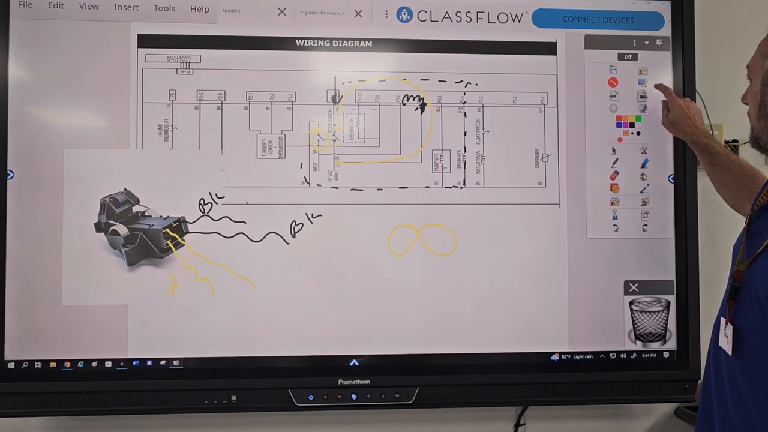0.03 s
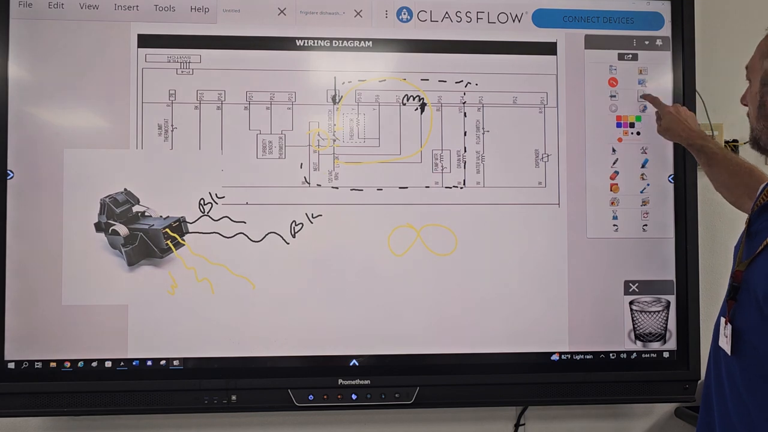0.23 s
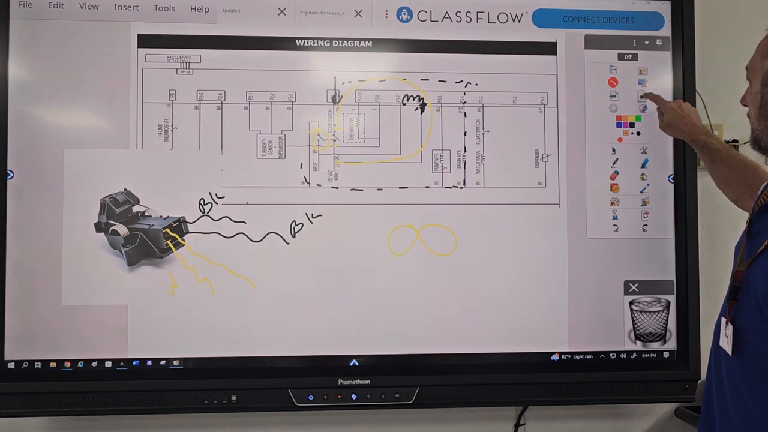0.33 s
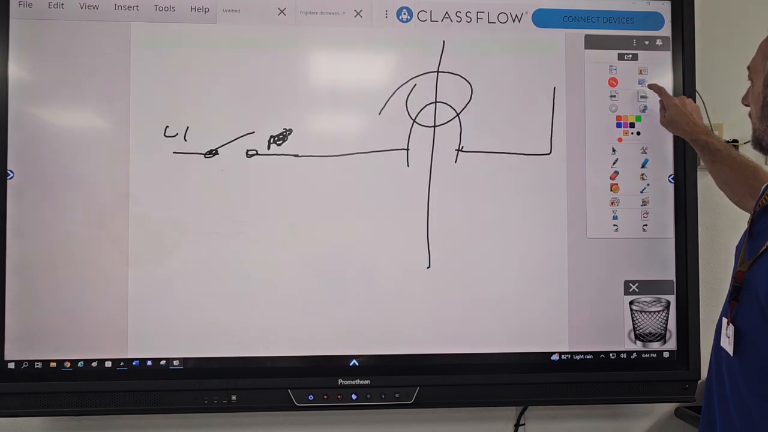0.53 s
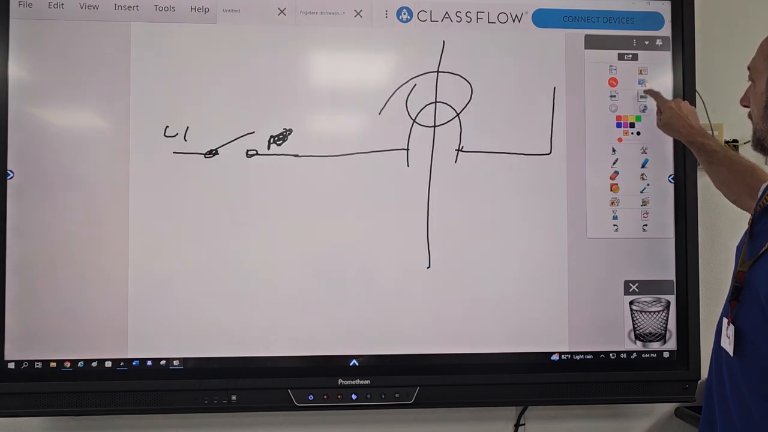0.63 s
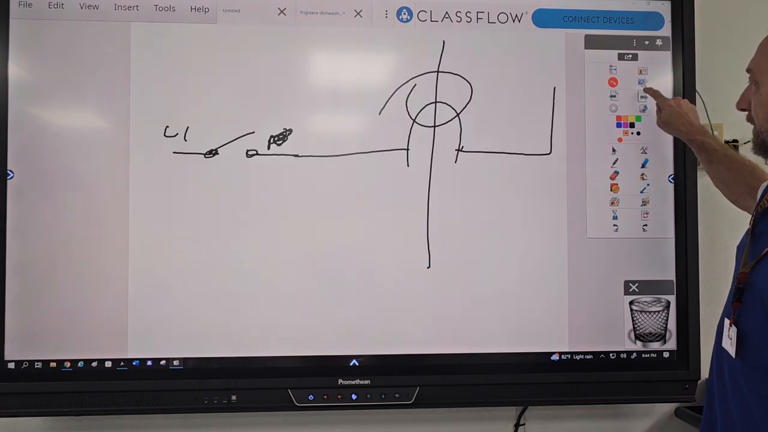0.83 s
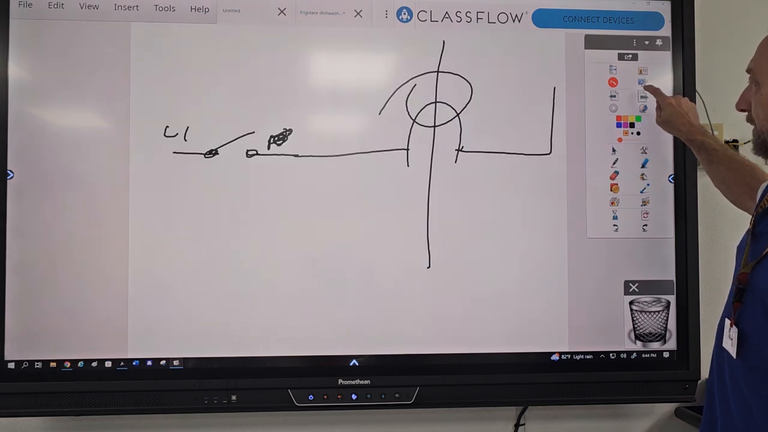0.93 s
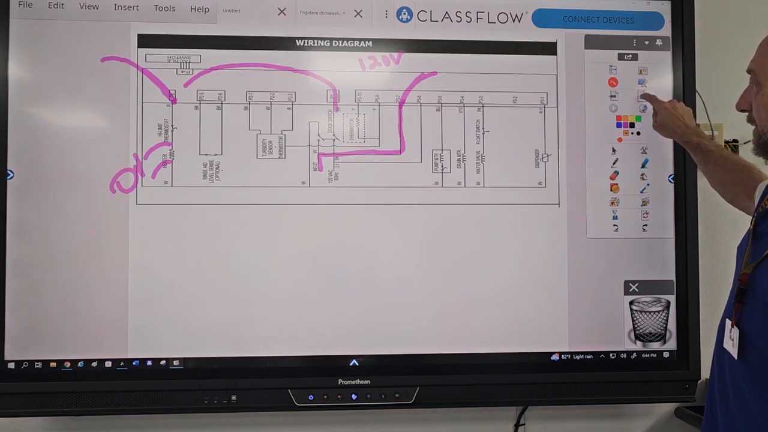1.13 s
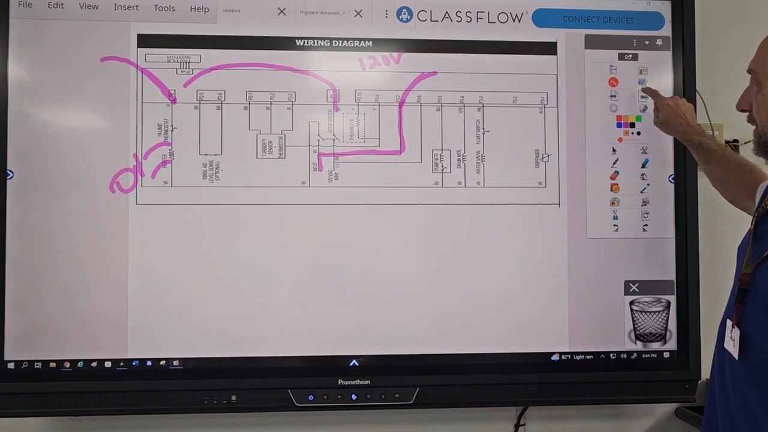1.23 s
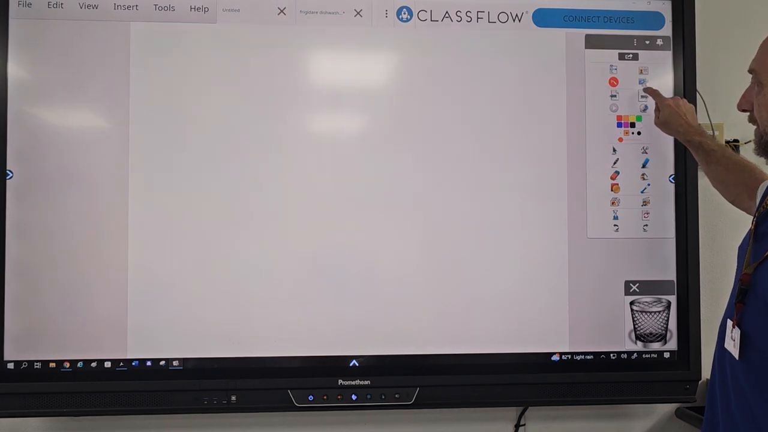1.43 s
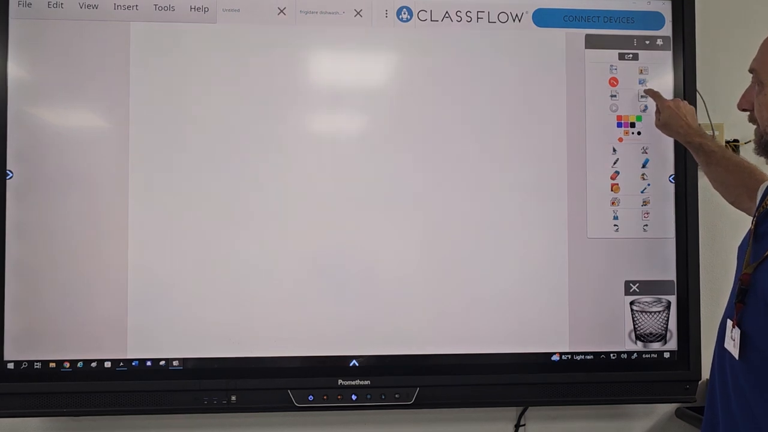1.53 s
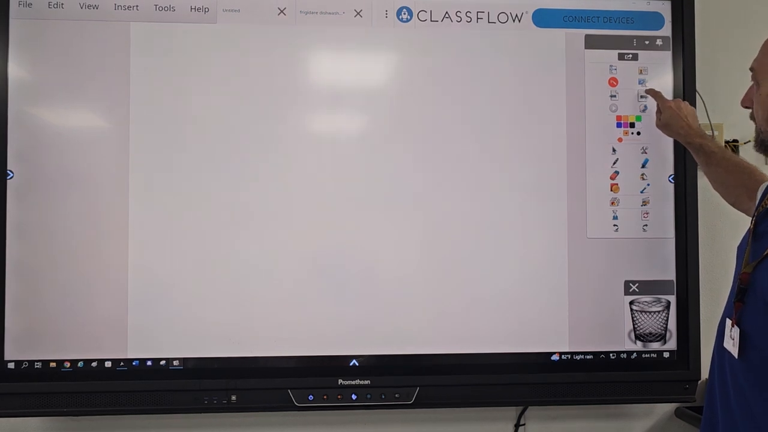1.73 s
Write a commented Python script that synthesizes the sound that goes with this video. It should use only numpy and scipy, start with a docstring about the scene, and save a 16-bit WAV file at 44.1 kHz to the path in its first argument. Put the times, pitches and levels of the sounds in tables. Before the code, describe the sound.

Dull fingertip knocks on a large glass touchscreen at about 0.23, 0.68 and 1.07 seconds, each a low woody boom with a brief buzzing frame rattle and short room tail. The third is softer with less buzz. A faint brush precedes the second at 0.63. Small hollow distant ticks come at 0.39 and 0.52, then from 1.22 to 1.73, fading, over quiet ventilation rumble, hiss and faint hum.

```python
"""Ventilation rumble, microphone hiss and faint hum (shaped noise, slow-wavering tones) lie under it all.
A fingertip knocks three times on one spot of a large glass panel in a quiet classroom: damped sines
boom, a diffuse room tail answers, and noise bands bloom and buzz as the frame rattles. Late frame rings
are single damped sines. Small hollow ticks from further off (damped modes plus a noise puff) start
after the first tap; a soft noise brush precedes the second."""
import sys
import numpy as np
from scipy import signal
from scipy.fft import rfft, irfft, next_fast_len
from scipy.io import wavfile
from scipy.ndimage import map_coordinates

SR = 44100
rng = np.random.default_rng(int(sys.argv[2]) if len(sys.argv) > 2 else 0)


def gain_from_decibels(decibels):
    """Convert decibel values to linear amplitude factors."""
    exponent = np.asarray(decibels, float) / 20
    return 10 ** exponent


def file_out(sig):
    """Save sig as 16-bit WAV at sys.argv[1]."""
    # one column per channel
    cols = np.atleast_2d(sig).T
    # limit, then scale
    lim = np.clip(cols, -1, 1)
    pcm = np.round(lim * 32767).astype(np.int16)
    wavfile.write(sys.argv[1], SR, pcm)


N = 79380

# fingertip taps: t/s, strength/dB, relative rattle level/dB, rattle t60/s
TAP_EVENTS = [(0.2335, 0.5, 5, .2), (.6820, -0.77, 2.5, .15), (1.0670, -3, -5.5, 0.2)]
# left-right likeness of ventilation, hiss and buzz: f/Hz, likeness (-1..1)
NOISE_LIKENESS = [(60, 0.96), (180, 0.9), (550, 0.29), (1650, -0.073), (4970, -0.016), (15000, 0.35)]


def along(points, hz):
    """(f/Hz, value) points interpolated on a log frequency axis."""
    f, v = np.transpose(points)
    return np.interp(np.log(hz + 1), np.log(f + 1), v)


def wobble(knots_per_s):
    """Smooth random curve through normal knots."""
    knots = rng.standard_normal(int(N * knots_per_s / SR) + 4)
    return map_coordinates(knots, [np.arange(N) * knots_per_s / SR])


def filtered(x, response):
    """x with its spectrum multiplied by response(f/Hz)."""
    m = next_fast_len(x.shape[-1] + SR // 2)
    spectrum = rfft(x, m) * response(np.fft.rfftfreq(m, 1 / SR))
    return irfft(spectrum, m)[..., :x.shape[-1]]


def paired(pair, likeness):
    """Two unrelated signals mixed as mid and side to a left-right likeness per frequency."""
    def mid_side_gains(hz):
        angle = np.arccos(np.clip(along(likeness, hz), -1, 1)) / 2
        return np.array([np.cos(angle), np.sin(angle)])

    mid, side = filtered(pair, mid_side_gains)
    return np.array([mid + side, mid - side])


def shaped_noise(spectrum, likeness):
    """Stereo noise of a given spectrum; its mid has rms 1."""
    noise = filtered(rng.standard_normal((2, N)), lambda hz: gain_from_decibels(along(spectrum, hz)))
    stereo = paired(noise, likeness)
    return stereo / stereo.mean(0).std()


def ringing(hz, db, t60_s, t):
    """Damped sines, one mode per column."""
    decay = gain_from_decibels(db - 60 * t[:, None] / np.maximum(t60_s, .01))
    return decay * np.sin(2 * np.pi * hz * t[:, None])


def add(track, start_s, sound):
    """Mixes a sound into track at start_s."""
    part = track[..., round(start_s * SR):][..., :sound.shape[-1]]
    part += sound[..., :part.shape[-1]]


def ventilation():
    """Low broadband rumble whose level wanders slowly."""
    # rumble spectrum: f/Hz, relative density/dB per Hz
    air_spectrum = [(12, -28.5), (20, -0.5), (133, -7), (211, -13), (277, -15), (305, -20.5), (461, -23),
                    (624, -30), (698, -34.5), (900, -35.5), (1170, -62.5), (1980, -120)]
    return gain_from_decibels(-58.5 + 1.2 * wobble(5)) * shaped_noise(air_spectrum, NOISE_LIKENESS)


def hiss():
    """Steady microphone noise with a left-right balance per frequency."""
    # hiss spectrum before balance: f/Hz, relative density/dB per Hz
    hiss_spectrum = [(410, -29.5), (700, -3.5), (900, -8), (1600, -8), (2200, -9.5), (2570, -18),
                     (3100, -14.5), (4500, -14.5), (5200, -20.5), (7500, -30.5), (10600, -37.5),
                     (11800, -26.5), (13000, -23.5), (15750, -19.5), (16500, -63)]
    # balance: f/Hz, left over right/dB
    balance = [(60, 4), (110, -9.5), (200, 0), (380, -8), (700, -3), (1290, 3.5), (2380, 0.5), (4400, 9),
               (8120, 5.5), (15000, 2)]
    noise = gain_from_decibels(-79) * shaped_noise(hiss_spectrum, NOISE_LIKENESS)
    return filtered(noise, lambda hz: gain_from_decibels(np.outer([.5, -.5], along(balance, hz))))


def hum():
    """Tones slightly unsteady in level and phase."""
    # tones: f/Hz, relative level/dB, phase waver/cycles
    tones = [(75.4, -69, .4), (118.4, -67, .4), (13130, -101, .6), (15547, -104, .6)]
    t = np.arange(N) / SR
    total = np.zeros(N)
    for hz, db, waver_cycles in tones:
        level = gain_from_decibels(db + 4 + 1.2 * wobble(12))
        cycles = hz * t + rng.random() + waver_cycles * wobble(3.7)
        total += level * np.sin(2 * np.pi * cycles)
    return total


def panel():
    """Low modes ring alike as every tap hits one spot; short upper glass modes and a bright fingernail tick
    near 5.9 kHz vary a little in level."""
    # low modes of panel and wall behind: f/Hz, level at 0 dB strength/dB, t60/s, polarity at tapped spot
    low_modes = [(53.1, -52.8, 0.99, -1), (72.7, -33.0, 0.368, -1), (75.3, -32.6, 0.465, 1),
                 (76.8, -38.9, 0.99, -1), (92.5, -40.8, 0.459, -1), (102.8, -33.7, 0.591, 1),
                 (115.9, -26.0, 0.338, 1), (120.6, -36.7, 0.99, -1), (123.2, -40.4, 0.974, 1),
                 (131.1, -36.4, 0.598, -1), (144.7, -36.0, 0.735, 1), (151.5, -25.0, 0.296, 1),
                 (155.0, -26.6, 0.462, -1), (160.7, -34.5, 0.685, -1), (174.5, -23.9, 0.274, -1),
                 (180.5, -35.5, 0.688, 1), (188.3, -31.5, 0.335, 1), (206.4, -34.2, 0.415, -1),
                 (219.2, -33.1, 0.324, 1), (227.9, -33.3, 0.319, -1), (245.9, -47.6, 0.99, 1),
                 (253.9, -35.6, 0.308, 1), (264.4, -25.5, 0.122, -1), (268.3, -31.8, 0.371, 1),
                 (278.4, -31.5, 0.32, -1), (288.7, -27.6, 0.191, 1), (303.8, -35.9, 0.335, -1),
                 (352.9, -47.3, 0.47, -1), (407.4, -37.6, 0.237, -1), (441.1, -33.6, 0.195, -1),
                 (449.6, -24.1, 0.044, 1), (462.7, -30.0, 0.136, -1), (501.5, -46.4, 0.247, -1),
                 (517.3, -42.0, 0.152, 1), (558.3, -50.8, 0.189, 1), (649.1, -58.3, 0.189, 1)]
    # short upper glass modes and fingernail tick at contact: f/Hz, level before onset and strength/dB, t60/s
    contact_modes = [(770, -48, 0.013), (1010, -53, 0.037), (5900, -69.5, 0.029)]
    soft_tip_hz, contact_rise_s = 750, 0.0024
    low, high, t = np.zeros(N), np.zeros(N), np.arange(SR) / SR
    hz, db, t60_s, polarity = np.transpose(low_modes)
    boom = ringing(hz, db, t60_s, t) @ np.sign(polarity)
    rise = 1 - np.exp(-t / contact_rise_s)
    for start_s, strength_db, *_ in TAP_EVENTS:
        add(low, start_s, gain_from_decibels(strength_db) * boom)
        mode_gains = gain_from_decibels(rng.normal(0, 1, len(contact_modes)))
        upper = ringing(*np.transpose(contact_modes), t) @ mode_gains
        add(high, start_s, gain_from_decibels(strength_db) * upper * rise)
    # the soft fingertip drives little above soft_tip_hz
    return filtered(low, lambda f: 1 / (1 + (f / soft_tip_hz) ** 10)) + high


def room(x):
    """Classroom tail: noise whose frequencies each die at their own speed, thinned in the bass."""
    # decay: f/Hz, t60/s
    decay = [(80, 0.32), (300, 0.58), (1000, 0.63), (4000, 0.16)]
    # left-right likeness of the tail: f/Hz, likeness (-1..1)
    tail_likeness = [(60, 0.49), (110, 0), (250, 0.92), (600, 0.16), (1500, 0)]
    level_db, delay_s, low_cut_hz = -14.5, 0.0026, 110
    sent = filtered(x, lambda f: f ** 2 / (f ** 2 + low_cut_hz ** 2))
    hz, t, bins = signal.stft(rng.standard_normal((2, SR)), SR, nperseg=1024)
    bins = bins * gain_from_decibels(-60 * t / along(decay, hz)[:, None])
    tail = paired(signal.istft(bins, SR, nperseg=1024)[1], tail_likeness)
    tail = tail / np.linalg.norm(tail[0])
    late = np.pad(sent, (round(delay_s * SR), 0))[None]
    return gain_from_decibels(level_db) * signal.fftconvolve(late, tail, axes=1)[:, :N]


def bloom():
    """Crowded middle modes, heard as a diffuse band that swells after each tap."""
    # crowded modes: f/Hz, relative density/dB per Hz
    dense_spectrum = [(250, -31.5), (320, 2), (370, 4.5), (450, -13.5), (560, -5.5), (723, -17),
                      (779, -14.5), (849, -16.5), (915, -16.5), (1000, -36.5), (1190, -22), (1310, -30),
                      (1500, -37), (1950, -67), (3300, -120)]
    level_db, rise_s, t60_s = -42.5, 0.012, 0.37
    envelope, t = np.zeros(N), np.arange(SR) / SR
    rise = 1 - np.exp(-(t / rise_s) ** 2)
    for start_s, strength_db, *_ in TAP_EVENTS:
        add(envelope, start_s, gain_from_decibels(strength_db - 60 * t / t60_s) * rise)
    return gain_from_decibels(level_db) * envelope * shaped_noise(dense_spectrum, [(600, 0.49), (1500, 0.34)])


def rattle():
    """Frame buzz that builds as the wave reaches it and dies unevenly, in a fast and a slow decay."""
    # buzz spectrum: f/Hz, relative density/dB per Hz
    buzz_spectrum = [(880, -39), (1500, -8.5), (1770, 0), (2200, -10.5), (2590, -5.5), (2830, -8.5),
                     (3480, -6), (6190, -13.5), (10900, -29.5), (15500, -23)]
    level_db, rise_s = -72, 0.012
    linger_db, linger_t60_s = -7.5, 0.85
    grit_db, grit_knots_per_s = 2, 260
    envelope, t = np.zeros(N), np.arange(SR) / SR
    rise = 1 - np.exp(-(t / rise_s) ** 2)
    for start_s, _, db, t60_s in TAP_EVENTS:
        fast = gain_from_decibels(db - 60 * t / t60_s)
        slow = gain_from_decibels(db + linger_db - 60 * t / linger_t60_s)
        add(envelope, start_s, (fast + slow) * rise)
    grit = gain_from_decibels(level_db + grit_db * wobble(grit_knots_per_s))
    return grit * envelope * shaped_noise(buzz_spectrum, NOISE_LIKENESS)


def frame_rings():
    """Late rings of the frame, one soft-onset damped sine each."""
    # rings: t/s, f/Hz, level before onset/dB, t60/s
    rings = [(.750, 3400, -73, .14), (.764, 5900, -84, .08), (1.14, 1600, -72, .08), (.315, 6100, -82, .12)]
    track, t = np.zeros(N), np.arange(SR) / SR
    for start_s, *mode in rings:
        add(track, start_s, ringing(*mode, t)[:, 0] * (1 - np.exp(-t / 0.0023)))
    return track


def ticks():
    """Small hollow ticks from further off: a few damped modes and a diffuse puff, each its own brightness."""
    # ticks: t/s, relative level/dB, brightness/dB (per octave on modes, overall on puff)
    tick_events = [(.392, -54.5, 0), (.5165, -62.5, 1.5), (1.224, -56.5, -0.5), (1.347, -58, 0.5),
                   (1.476, -65, -2), (1.612, -62, -5), (1.730, -66, 0.5)]
    # modes: f/Hz, relative level/dB, t60/s
    tick_modes = [(549, -3.5, 0.15), (568, -2, 0.16), (785.6, -9, 0.14), (939, -11, 0.09),
                  (1351, -12.5, 0.1), (1441, -14, 0.053), (1820, -16.5, 0.046), (2060, -21, 0.036)]
    # puff spectrum: f/Hz, relative density/dB per Hz
    puff_spectrum = [(300, -22), (500, 4), (1400, -4.5), (2300, -14), (3000, -21.5), (6000, -58.5)]
    rise_s, puff_db, puff_t60_s = 0.0018, -12, 0.2
    ring, puff, t = np.zeros(N), np.zeros(N), np.arange(SR // 4) / SR
    hz, mode_db, t60_s = np.transpose(tick_modes)
    rise = 1 - np.exp(-t / rise_s)
    for start_s, db, bright_db in tick_events:
        colour_db = bright_db * np.log2(hz / hz[0]) + rng.normal(0, 2, len(hz))
        modes = ringing(hz, mode_db + colour_db, t60_s, t).sum(1)
        add(ring, start_s, gain_from_decibels(db) * rise * modes)
        add(puff, start_s, gain_from_decibels(db + bright_db + puff_db - 60 * t / puff_t60_s) * rise)
    return ring + puff * shaped_noise(puff_spectrum, [(500, 0.17)])


def scuff():
    """Soft dull brush just before the second tap: decaying shaped noise."""
    # brushes: t/s, mid level before onset and decay/dB rms, t60/s
    brushes = [(.627, -61, .35)]
    # brush spectrum: f/Hz, relative density/dB per Hz
    brush_spectrum = [(150, -22), (220, -5), (430, 0.5), (700, -5), (1500, -35), (3000, -48.5)]
    envelope, t = np.zeros(N), np.arange(SR // 2) / SR
    for start_s, db, t60_s in brushes:
        add(envelope, start_s, gain_from_decibels(db - 60 * t / t60_s) * (1 - np.exp(-t / 0.0011)))
    return envelope * shaped_noise(brush_spectrum, [(500, 0.96)])


def scene():
    """Sums all layers; panel and frame rings alone feed the room."""
    background = ventilation() + hiss() + hum()
    struck = panel() + frame_rings()
    return background + struck + room(struck) + bloom() + rattle() + ticks() + scuff()


def top_cut(x):
    """Nothing passes above the cut-off."""
    return signal.sosfilt(signal.butter(12, 15890, fs=SR, output="sos"), x)


def record(dry):
    """Takes the scene as the finished mix and returns the output signal."""
    return top_cut(dry)


dry = scene()
out = record(dry)
file_out(out)
```